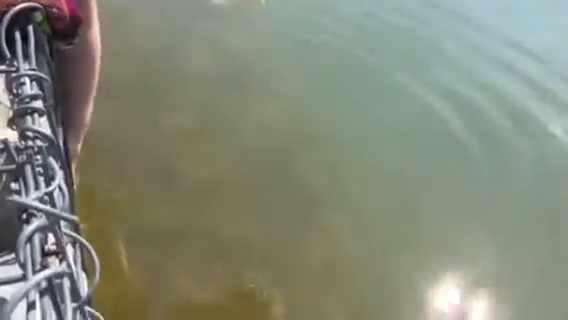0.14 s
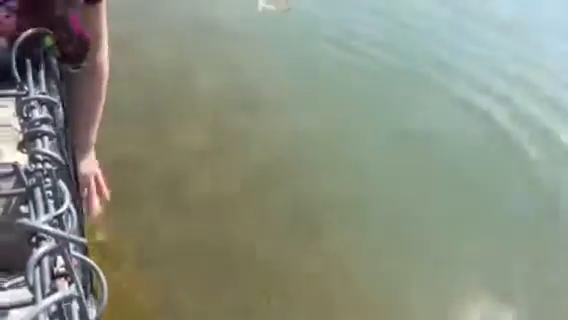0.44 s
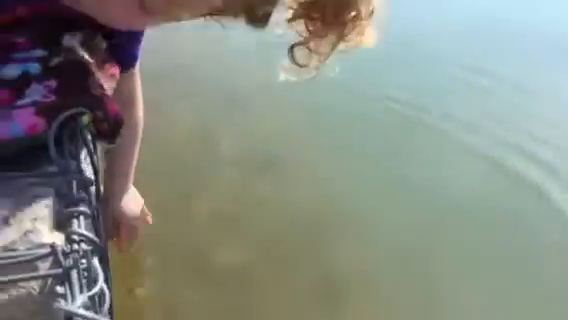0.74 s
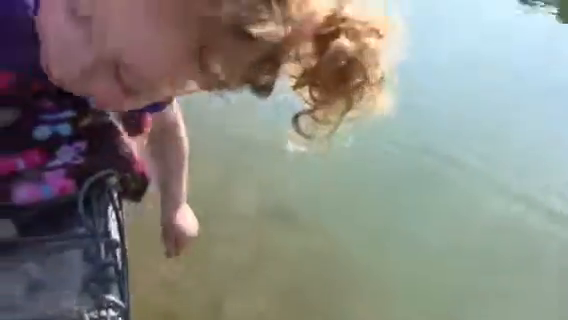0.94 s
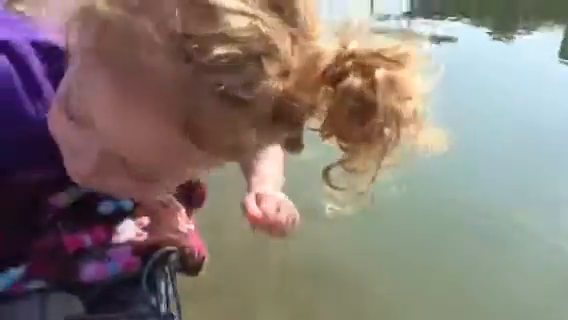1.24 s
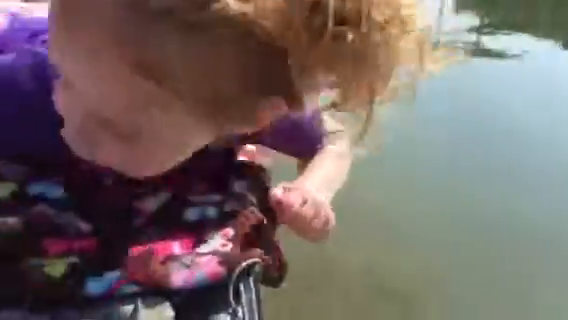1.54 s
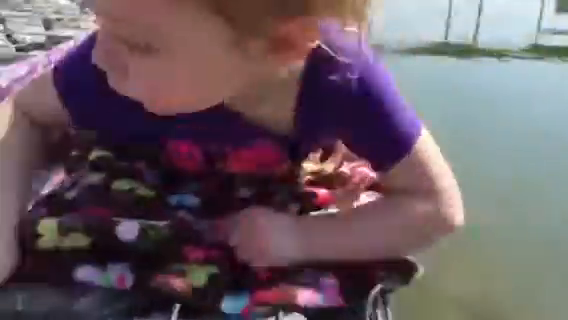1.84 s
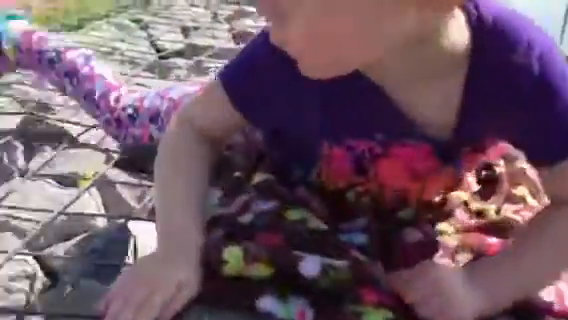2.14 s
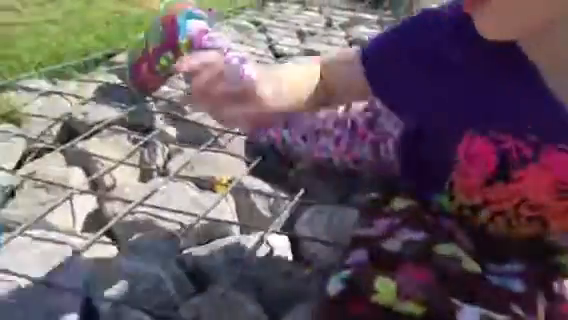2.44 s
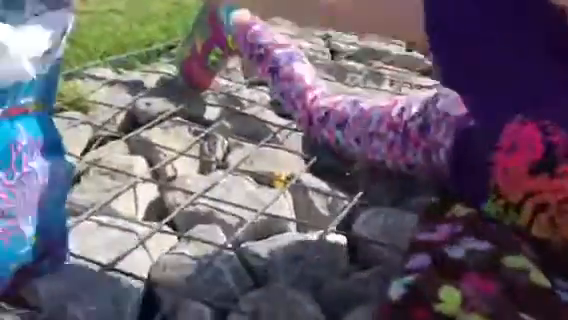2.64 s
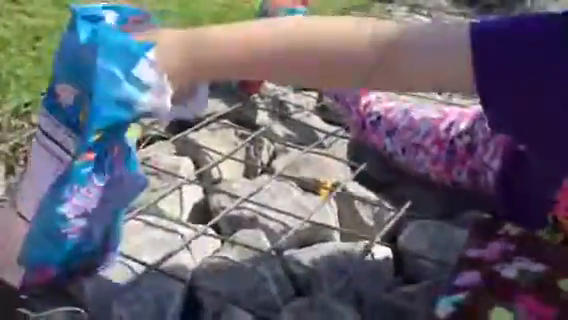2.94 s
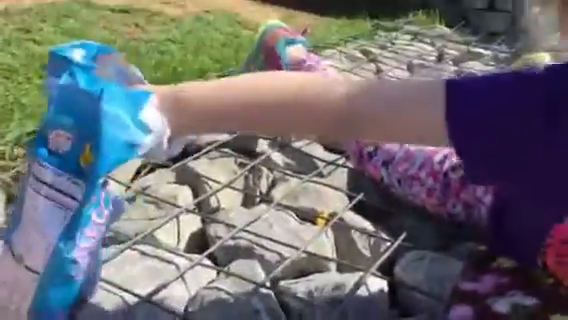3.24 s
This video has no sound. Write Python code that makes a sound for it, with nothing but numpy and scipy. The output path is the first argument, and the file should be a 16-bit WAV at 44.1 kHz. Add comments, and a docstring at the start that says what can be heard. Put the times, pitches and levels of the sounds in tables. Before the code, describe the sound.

A plastic snack bag crinkles close by from about 2.8 s to the end at 3.4: bright rustle peaking near 2.9, then hollower, with irregular crisp snaps. Before it, steady low distant rumble, faint airy wash and hum outdoors. Wind thumps softly on the microphone at 0.5-1.1 s, with low gusts after 2.2. Faint drop-like ticks at 0.1, 0.6, 1.4 and 2.5; thin high whine, strongest near 0.9.

```python
"""By a pond, a child leans over the water, then reaches into a plastic snack bag.
Shaped noise makes a low distant rumble, a wash, airy hiss and wind; wavering tones make a low hum
and a thin high whine, perhaps an insect. Short low swings are gusts thumping on the microphone.
Clicks that ring make faint ticks of drops and of movement on the stones, then the snapping creases.
The film's rustle is many tiny ringing clicks over smooth noise, coloured by the inside of the bag."""
import sys
import numpy as np
from scipy import signal
from scipy.fft import rfft, irfft
from scipy.io import wavfile
from scipy.ndimage import uniform_filter1d

SR = 44100
rng = np.random.default_rng(int(sys.argv[2]) if len(sys.argv) > 2 else 0)


def unload_wav(signal):
    """Save mono or channel-first audio to the path in sys.argv[1] as 16-bit WAV at rate SR, clipped to [-1, 1]."""
    wavfile.write(
        sys.argv[1],
        SR,
        np.round(np.clip(np.atleast_2d(signal).T, -1, 1) * 32767).astype(np.int16),
    )


N = 149940  # length in samples

# Tone colours, as relative strength across pitch: pitch_hz, strength_db (per Hz)
RUMBLE_COLOUR = [(40, -27), (90, -6), (130, 2), (160, -4.5), (205, -1), (255, -10), (320, -8), (400, -13.5),
                 (520, -20), (700, -27), (1300, -37.5), (3000, -64.5)]
WASH_COLOUR = [(400, 3.5), (650, 4.5), (920, 9.5), (1250, -5), (3050, -12.5), (4200, -30), (16000, -65)]
AIR_COLOUR = [(500, 1), (950, -4.5), (1700, 4), (2500, -4.5), (3400, -9.5), (4300, -8), (5100, -12.5),
              (6400, -11), (7700, -20), (9200, -19), (10500, -26.5), (14000, -23.5), (16000, -33)]
WIND_COLOUR = [(15, -56), (33, -39), (48, -1.5), (64, 1), (100, -10.5), (150, -17), (300, -32), (1000, -80)]
HISS_COLOUR = [(1500, -15), (3000, 3.5), (4100, 5.5), (5200, -0.5), (6700, 0.5), (8000, -2), (9600, -0.5),
               (10800, -7.5), (13000, -3), (16000, -9)]
HOLLOW_COLOUR = [(400, -35), (800, -5), (1250, -1), (1750, -5.5), (2100, 1), (2600, -8.5), (3500, -11),
                 (6000, -21.5), (15000, -43)]
# Loudness over time of the distant rumble, distant wash, airy hiss and wind: time_s, level_db
RUMBLE_LEVEL = [(0, -42.5), (.6, -40.5), (1.1, -41.5), (1.25, -42.5), (1.7, -42), (2.2, -40), (2.35, -41.5),
                (2.75, -41.5), (3.0, -38.5), (3.4, -42.5)]
WASH_LEVEL = [(0, -58.5), (1.45, -56.5), (1.9, -61), (3.4, -73)]
AIR_LEVEL = [(0, -64.5), (.6, -67.5), (1.0, -63), (1.45, -64), (1.9, -65), (2.1, -60), (2.3, -63.5),
             (2.7, -62.5), (3.4, -64)]
WIND_LEVEL = [(0, -32), (.4, -46.5), (.7, -42), (1.1, -39.5), (1.19, -48), (1.34, -43.5), (1.42, -43.5),
              (1.6, -39.5), (1.96, -38), (2.08, -39), (2.21, -33), (2.31, -41.5), (2.48, -34),
              (2.57, -42.5), (2.72, -33.5), (2.83, -45), (3.04, -36.5), (3.19, -46), (3.31, -38.5),
              (3.4, -39)]
AIR_FLICKER_DB, AIR_FLICKER_PER_S = 3.5, 13.7

# Stretches of the high whine: start_s, end_s, level_db (mid-swell, before it wavers)
HIGH_WHINE = [(-.05, 0.076, -68.5), (0.097, 0.32, -67), (0.313, 0.466, -70), (.47, 0.573, -74),
              (0.577, .645, -72), (0.69, 0.832, -67.5), (0.784, 1.014, -61), (0.995, 1.132, -62.5),
              (1.14, 1.42, -64), (1.406, 1.533, -73), (1.526, 1.805, -70.5), (1.772, 2.0, -74.5),
              (2.017, 2.248, -81), (2.254, 2.33, -72), (2.334, 2.72, -72), (2.712, 2.9, -69.5),
              (3.15, 3.39, -71.5)]
HIGH_WHINE_HZ, WHINE_WANDER_HZ, WHINE_WAVER_DB = 6140, 2.7, 1.0
SWELL_POWER = 0.9  # below 1 makes a swell fuller than a plain sine arch
# Faint tones and whistling bands of noise: start_s, end_s, pitch_hz, width_hz, level_db (mid-swell)
FAR_TONES = [(0.946, 1.35, 2985, 200, -72.5), (1.272, 1.6, 1688, 21, -66), (1.66, 1.857, 1683, 45, -64),
             (1.974, 2.2, 1660, 140, -65), (1.84, 2.18, 3350, 13, -77), (2.3, 2.66, 2170, 150, -68)]
HUM_HZ, HUM_WIDTH_HZ, HUM_DB = 299.7, 5.4, -59

# Drops and small contacts: start_s, level_db (before TICK_DB), pitch_hz, noise_fade_s (by 60 dB),
# sharpness of the ring (Q, no unit)
TICKS = [(.1257, -52.5, 9200, .012, 1.5), (.1545, -66.5, 8000, .013, 3.5), (.543, -69.5, 6200, 0.0091, 3.5),
         (.642, -63, 2940, 0.032, 24), (.97, -64, 13600, 0.0099, 7.9), (1.371, -59.5, 6340, 0.035, 9),
         (1.372, -61.5, 2350, .02, 8), (1.3868, -61.5, 2580, .002, 0.8), (1.387, -68, 9000, 0.0032, 1),
         (1.447, -60, 2210, 0.055, 9.4), (2.482, -55, 2140, 0.027, 24)]
TICK_DB, TICK_CRACK_DB = 3.5, -35  # lift of all ticks; crack beside the ring
# Gusts thumping on the microphone: middle_s, peak_db
BUFFETS = [(0.488, -25.5), (0.676, -26.5), (0.825, -27.5), (0.881, -28), (0.995, -25.5), (1.069, -25),
           (1.124, -28.5)]
BUFFET_HZ, BUFFET_S = 70, 0.0073

# The hand sliding along the film, before the bag colours it: time_s, bright_hiss_db, hollow_rustle_db
HAND = [(2.81, -105, -105), (2.84, -66, -69), (2.865, -55, -51), (2.93, -50, -52), (2.98, -55, -55.5),
        (3.05, -57, -54), (3.14, -68, -57.5), (3.18, -62, -55), (3.245, -63, -53), (3.29, -65.5, -58),
        (3.35, -66, -54), (3.4, -81, -50)]
CRINKLES_PER_S, CRINKLE_SPREAD_DB, CRINKLE_Q = 700, 4.5, 6.2
CLUMP_DB, CLUMPS_PER_S = -1, 58  # how far, and how fast, the crinkle rate wanders
SLIDE_SHARE = 1  # smooth noise beside the crinkles
# Creases snapping: start_s, level_db (before SNAP_DB and the bag), pitch_hz of the buckling facet,
# noise_fade_s (by 60 dB), sharpness of the ring (Q, no unit)
SNAPS = [(2.8625, -47.5, 4000, .021, 0.97), (2.8948, -34.5, 3420, 0.0053, 4.4),
         (2.8951, -43, 6100, 0.011, 11), (2.9283, -45, 7800, 0.019, 0.85), (2.9325, -44, 1700, 0.015, 14),
         (2.9383, -46, 4300, 0.0057, 2), (2.963, -50, 4400, .005, 4), (3.005, -38.5, 12400, 0.018, 1.1),
         (3.0125, -38, 2930, 0.019, 3), (3.014, -42.5, 1750, 0.013, 4), (3.0405, -47, 6660, 0.015, 5.2),
         (3.055, -47, 6600, .022, 0.96), (3.0675, -44.5, 3630, .008, 3), (3.0998, -40.5, 1190, 0.0089, 3.7),
         (3.1, -44, 3750, 0.0055, 8.9), (3.2095, -48.5, 950, 0.01, 5.9), (3.176, -45, 4250, 0.015, 8.1),
         (3.1768, -37, 2020, 0.022, 1.5), (3.1805, -49, 7040, 0.0064, 1.5),
         (3.1895, -52.5, 6850, 0.0085, 5.6), (3.2062, -40.5, 3500, 0.011, 2.7),
         (3.2078, -37, 1700, 0.014, 0.85), (3.2357, -45.5, 3500, 0.0066, 1.4),
         (3.2475, -41.5, 2630, 0.016, 1.9), (3.3905, -35, 2620, 0.014, 4)]
SNAP_DB, SNAP_CRACK_DB = -2, -11.5  # shift of all snaps; crack beside the ring
CRACK_LOW_HZ, CRACK_HIGH_HZ = 800, 8000
TEAR_SHARE = 0.14  # noise after each click
CAVITY_FADE_S, CAVITY_DB, CAVITY_HZ = 0.033, -13.5, 3470  # sound rattling about inside the bag
# Pitches the air in the bag favours or swallows: pitch_hz, sharpness (Q, no unit), gain_db
BAG_BODY = [(950, 9.6, 2), (1340, 24, -1), (1700, 12, 3.5), (2260, 6.6, -8), (2620, 22, 8), (3500, 40, -4),
            (6600, 12, 3)]
CUTOFF_HZ = 16000


def from_db(db):
    """Turn decibels into a plain multiplier."""
    return 10 ** (np.asarray(db) / 20)


def rms_one(x):
    """Scale a sound to an average (rms) strength of 1."""
    return x / np.sqrt(np.mean(x ** 2) + 1e-20)


def in_time(rows):
    """Join a table's points with straight lines, giving each column a value at every sample."""
    times, *columns = np.transpose(rows)
    return [np.interp(np.arange(N) / SR, times, column) for column in columns]


def coloured(x, spectrum):
    """Strengthen or weaken each pitch of a sound to give it a tone colour; rms 1."""
    hz, db = np.transpose(spectrum)
    bins = np.maximum(np.arange(N // 2 + 1) * SR / N, 1)
    gain = from_db(np.interp(np.log(bins), np.log(hz), db))
    return rms_one(irfft(rfft(x) * gain, N))


def drift(rate):
    """A slow random wander with rms 1: noise smoothed twice, faster for a higher rate in Hz."""
    r = np.exp(-2 * np.pi * rate / SR)
    smooth = signal.lfilter([1], [1, -2 * r, r * r], rng.standard_normal(N + SR))
    return rms_one(smooth[SR:])  # drop the first second, while the filter settles


def flickering():
    """Noise whose quarter-octave bands waver in level, each on its own; the treble stays steady."""
    hz = np.arange(N // 2 + 1) * SR / N
    band = np.floor(4 * np.log2(np.clip(hz, 400, 4800)))
    white = rfft(rng.standard_normal(N))
    treble = band == band.max()
    out = irfft(white * treble, N)
    for k in np.unique(band[~treble]):
        waver = from_db(AIR_FLICKER_DB * drift(AIR_FLICKER_PER_S))
        out += irfft(white * (band == k), N) * waver
    return out


def outdoors():
    """Noise shaped into a distant rumble, a wash that swells and recedes, and a soft airy hiss."""
    layers = [(RUMBLE_LEVEL, RUMBLE_COLOUR, rng.standard_normal(N)),
              (WASH_LEVEL, WASH_COLOUR, flickering()),
              (AIR_LEVEL, AIR_COLOUR, flickering())]
    return sum(from_db(in_time(level)[0]) * coloured(noise, colour) for level, colour, noise in layers)


def gusts():
    """Wind on the microphone: low noise of even strength that swells and lulls with the breeze."""
    noise = coloured(rng.standard_normal(N), WIND_COLOUR)
    strength = np.sqrt(uniform_filter1d(noise ** 2, size=SR // 10))  # over a tenth of a second
    return from_db(in_time(WIND_LEVEL)[0]) * noise / strength


def swell(start, end):
    """A smooth rise and fall between two times."""
    share = np.clip((np.arange(N) / SR - start) / (end - start), 0, 1)
    return np.abs(np.sin(np.pi * share)) ** SWELL_POWER


def narrow(hz, width_hz):
    """A tone that wavers in level and phase, more quickly when wider; rms about 1."""
    turn = 2 * np.pi * hz * np.arange(N) / SR
    return drift(width_hz / 2) * np.cos(turn) + drift(width_hz / 2) * np.sin(turn)


def whines():
    """A wandering high whine sounds in separate swells; fainter tones come and go over a low hum."""
    pitch = HIGH_WHINE_HZ + WHINE_WANDER_HZ * drift(7.3)
    tone = np.sqrt(2) * np.sin(2 * np.pi * np.cumsum(pitch) / SR)
    swells = sum(from_db(db) * swell(start, end) for start, end, db in HIGH_WHINE)
    out = swells * from_db(WHINE_WAVER_DB * drift(25)) * tone
    for start, end, hz, width_hz, db in FAR_TONES:
        out += from_db(db) * swell(start, end) * narrow(hz, width_hz)
    return out + from_db(HUM_DB) * narrow(HUM_HZ, HUM_WIDTH_HZ)


def resonate(x, hz, q):
    """Let a sound ring at one pitch; a higher q rings longer and purer, and is at least 1."""
    return signal.lfilter(*signal.iirpeak(hz, max(q, 1), fs=SR), x + 1e-18)


def clicks(rows, crack_db):
    """Each is a click and a dying burst of noise: part rings at its pitch, part is a broad crack."""
    out, t = np.zeros(N + SR), np.arange(SR // 20) / SR
    crack_band = signal.butter(1, [CRACK_LOW_HZ, CRACK_HIGH_HZ], "band", fs=SR, output="sos")
    for start_s, db, hz, fade_s, q in rows:
        push = TEAR_SHARE * rng.standard_normal((2, len(t))) * from_db(-60 * t / fade_s)
        push[:, 0] += 1  # the click itself
        ring = resonate(resonate(push[0], hz, q), hz, 1)
        crack = signal.sosfilt(crack_band, push[1])
        sound = rms_one(rms_one(ring) + from_db(crack_db) * rms_one(crack))
        # the level counts as if all the energy fell within 4.5 ms
        loudness = from_db(db) * np.sqrt(.0045 * SR / len(t))
        start = int(start_s * SR)
        out[start:start + len(t)] += loudness * sound
    return out[:N]


def ticks():
    """Drops and small contacts: faint clicks, nearly all ring and hardly any crack."""
    return from_db(TICK_DB) * clicks(TICKS, TICK_CRACK_DB)


def buffets():
    """Each small gust is a swing or two of low pressure."""
    t, out = np.arange(N) / SR, np.zeros(N)
    for middle_s, db in BUFFETS:
        bump = np.exp(-.5 * ((t - middle_s) / BUFFET_S) ** 2)
        out += from_db(db) * bump * np.sin(2 * np.pi * (BUFFET_HZ * t + rng.random()))
    return out


def crinkles():
    """Many tiny facets buckle in random clumps, each ringing briefly, over the smooth noise of sliding."""
    sizes = from_db(CRINKLE_SPREAD_DB * np.minimum(rng.exponential(1, N), 4)) * rng.choice([-1, 1], N)
    rate = CRINKLES_PER_S * from_db(CLUMP_DB * drift(CLUMPS_PER_S))
    born = rng.random(N) < rate / SR
    pitches = np.linspace(900, 15000, 20)
    dealt = rng.integers(0, len(pitches), N)  # which pitch each crinkle gets
    grains = sum(resonate(sizes * born * (dealt == k), hz, CRINKLE_Q) for k, hz in enumerate(pitches))
    return rms_one(grains) + SLIDE_SHARE * rng.standard_normal(N)


def cavity(x):
    """Short reflections between the walls of the bag give each snap a ragged, coloured tail."""
    t = np.arange(SR // 20) / SR
    tail = resonate(rng.standard_normal(len(t)), CAVITY_HZ, 1) * from_db(-60 * t / CAVITY_FADE_S)
    tail /= np.sqrt(np.sum(tail ** 2))
    return x + from_db(CAVITY_DB) * signal.fftconvolve(x, tail)[:N]


def bag():
    """The film hisses under the hand, the bag rustles hollowly, creases snap; its body colours them all."""
    hiss_db, hollow_db = in_time(HAND)
    hiss = from_db(hiss_db) * coloured(crinkles(), HISS_COLOUR)
    hollow = from_db(hollow_db) * coloured(crinkles(), HOLLOW_COLOUR)
    snaps = from_db(SNAP_DB) * clicks(SNAPS, SNAP_CRACK_DB)
    out = cavity(hiss + hollow + snaps)
    for hz, q, db in BAG_BODY:
        out = out + (from_db(db) - 1) * resonate(out, hz, q)
    return out


def scene():
    """Everything added together at one microphone."""
    return (outdoors() + gusts() + whines() + ticks() + buffets() + bag())[None]


def record(dry):
    """The top of the treble is cut steeply."""
    return signal.sosfilt(signal.ellip(10, .2, 80, CUTOFF_HZ, fs=SR, output="sos"), dry)


dry = scene()
out = record(dry)
unload_wav(out)
```